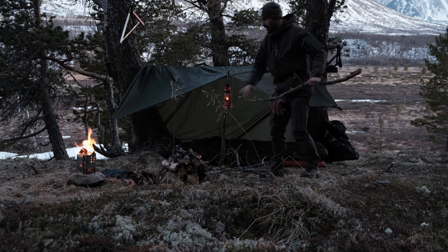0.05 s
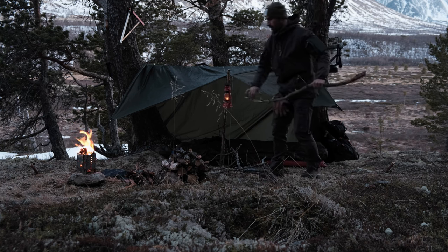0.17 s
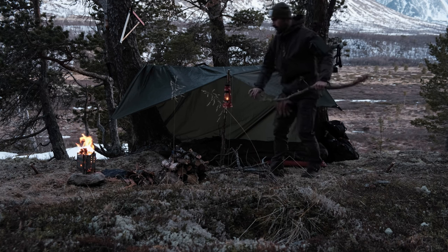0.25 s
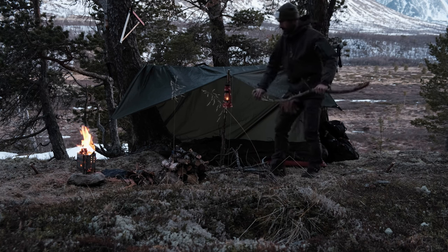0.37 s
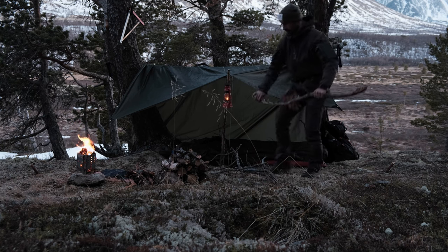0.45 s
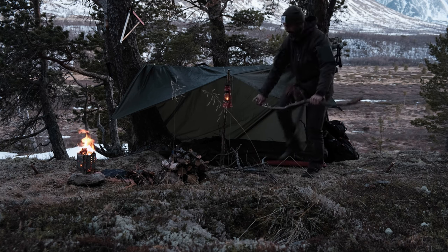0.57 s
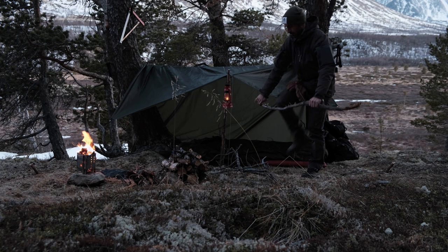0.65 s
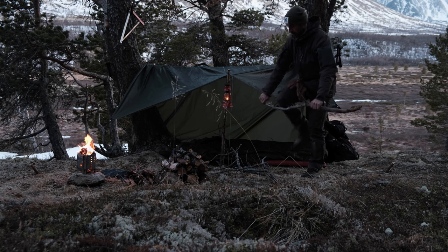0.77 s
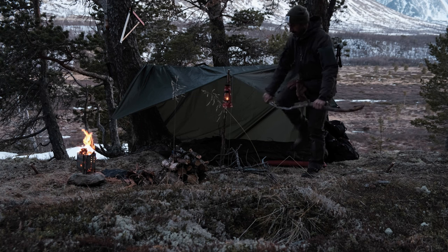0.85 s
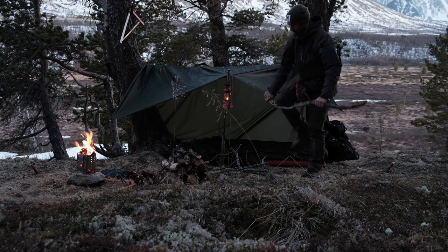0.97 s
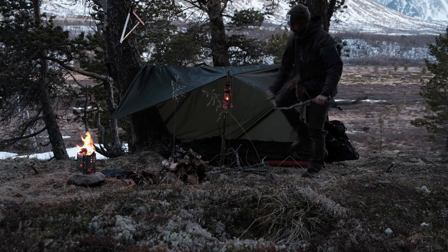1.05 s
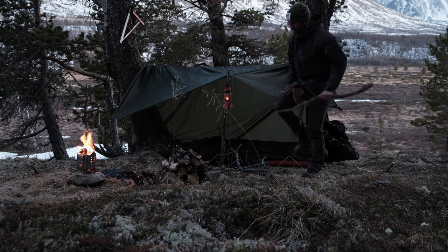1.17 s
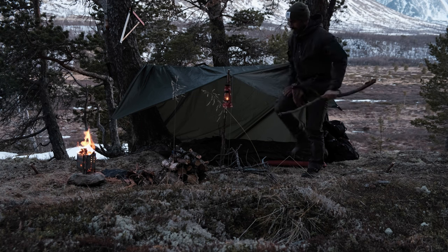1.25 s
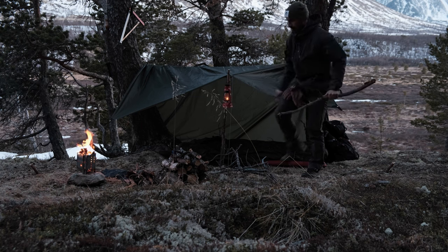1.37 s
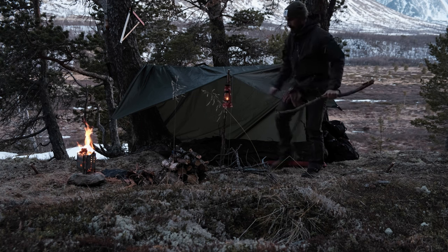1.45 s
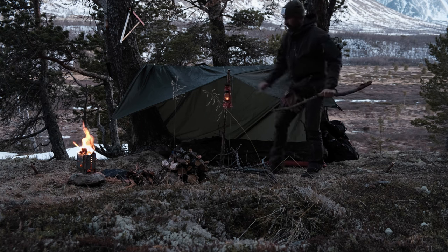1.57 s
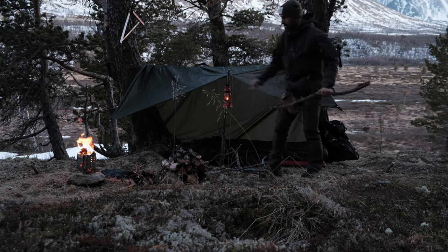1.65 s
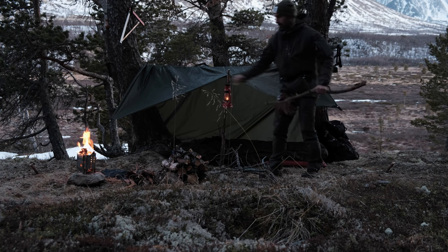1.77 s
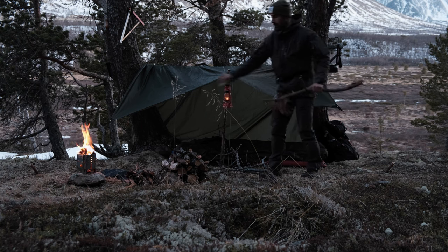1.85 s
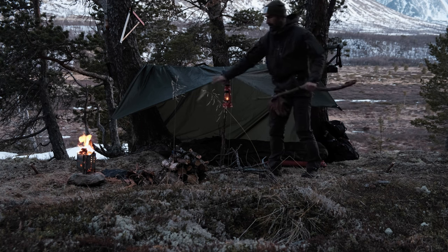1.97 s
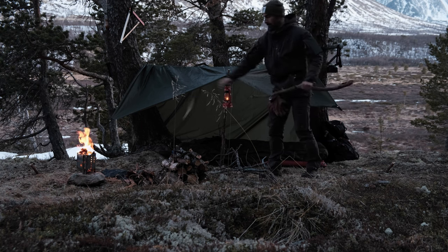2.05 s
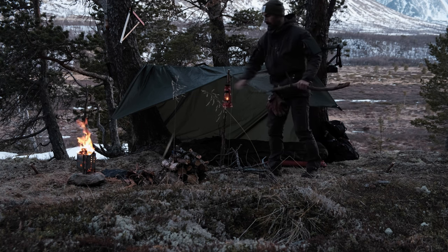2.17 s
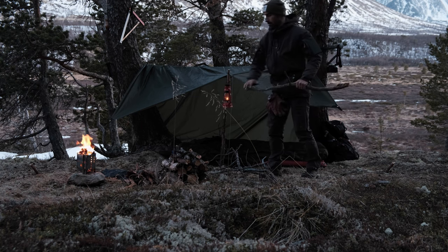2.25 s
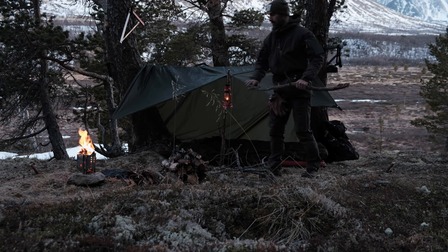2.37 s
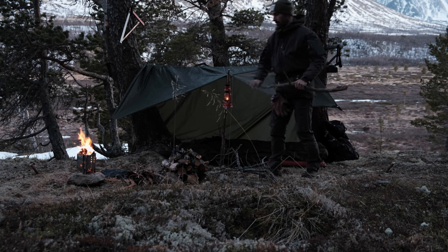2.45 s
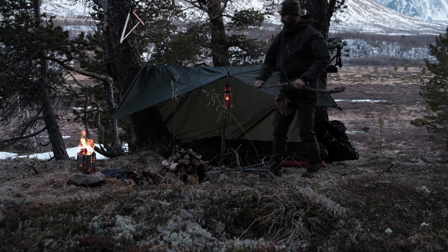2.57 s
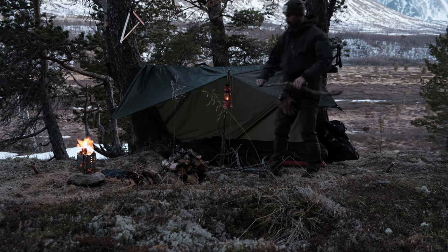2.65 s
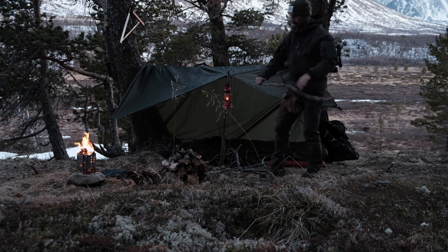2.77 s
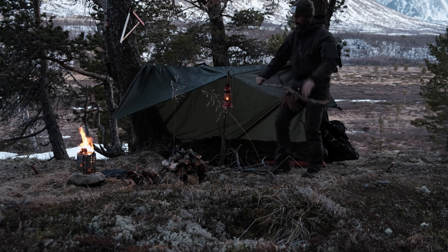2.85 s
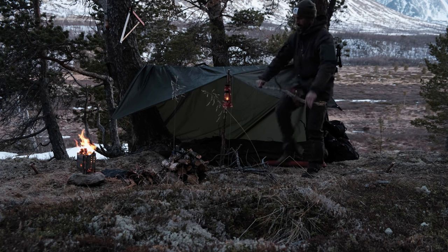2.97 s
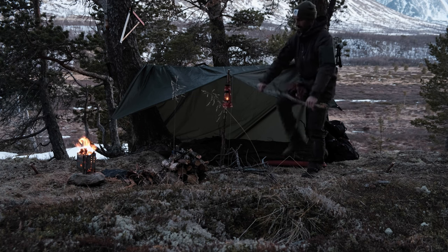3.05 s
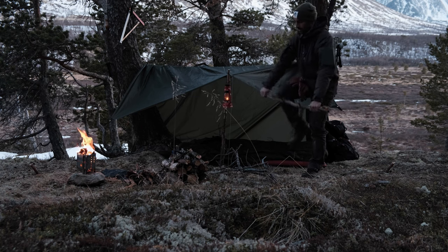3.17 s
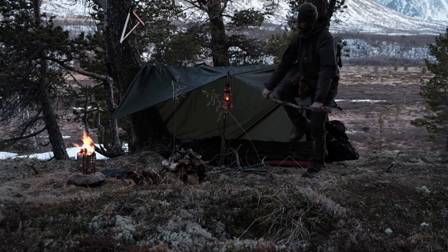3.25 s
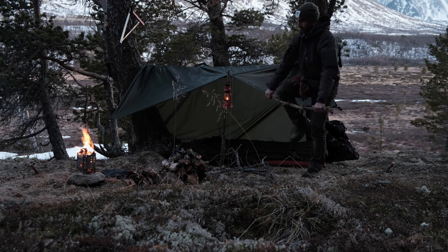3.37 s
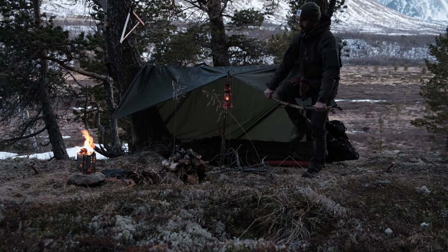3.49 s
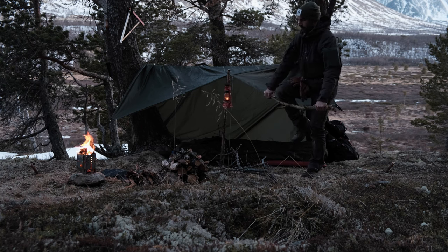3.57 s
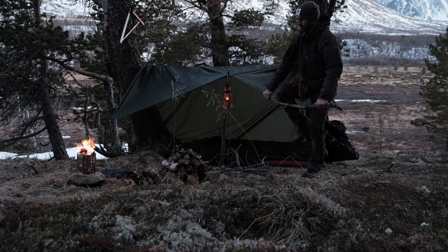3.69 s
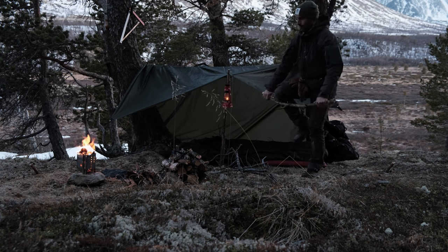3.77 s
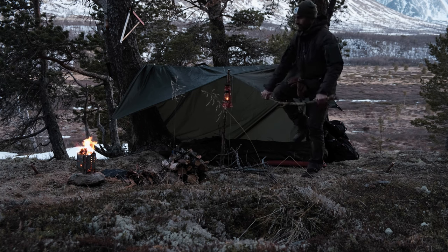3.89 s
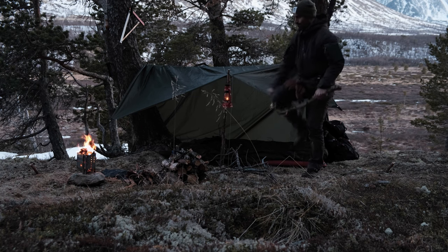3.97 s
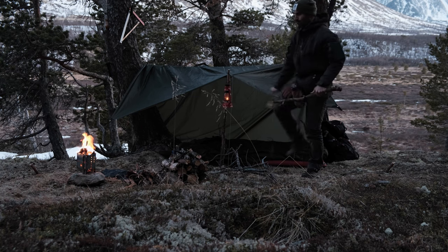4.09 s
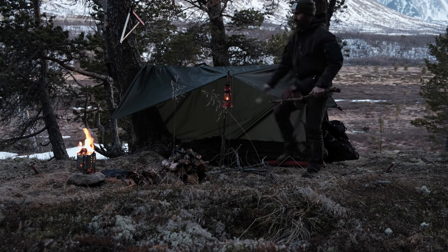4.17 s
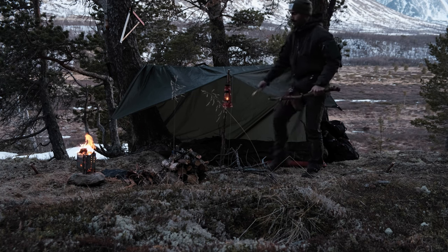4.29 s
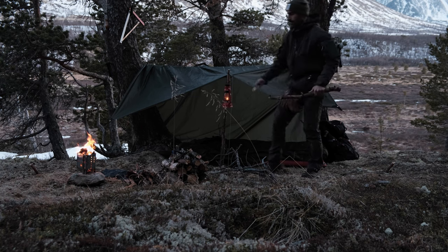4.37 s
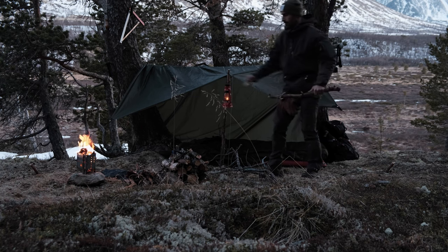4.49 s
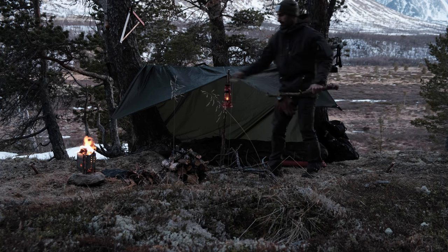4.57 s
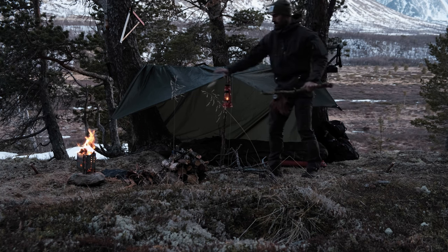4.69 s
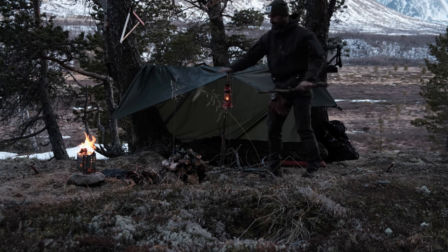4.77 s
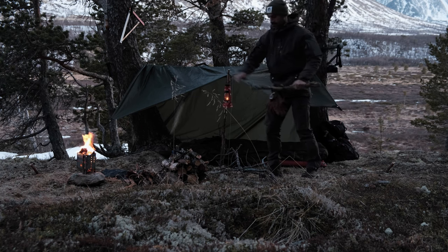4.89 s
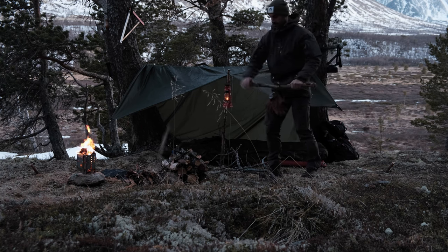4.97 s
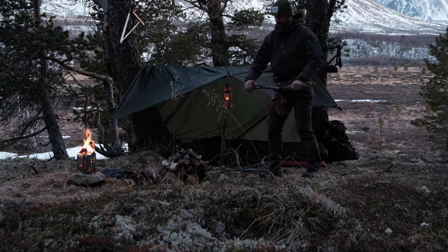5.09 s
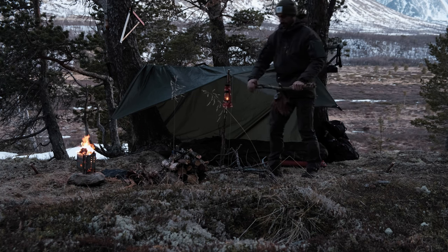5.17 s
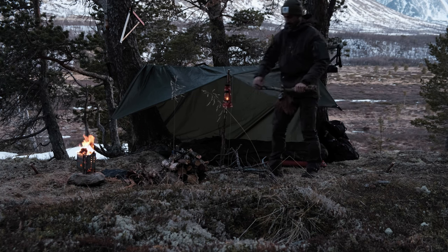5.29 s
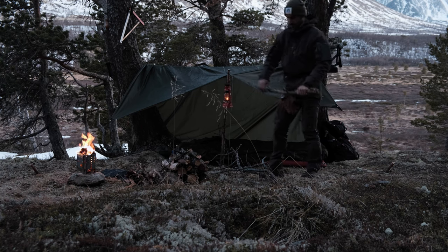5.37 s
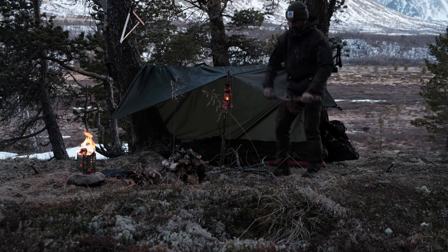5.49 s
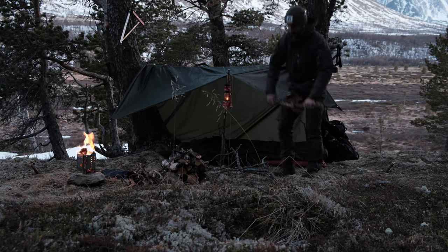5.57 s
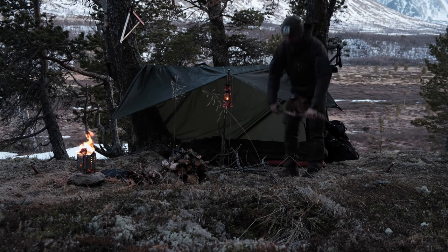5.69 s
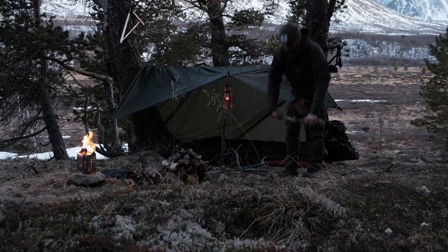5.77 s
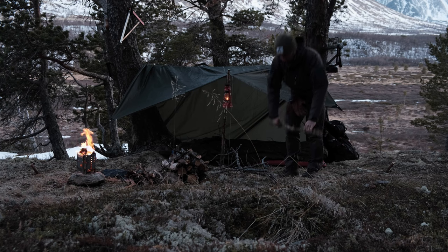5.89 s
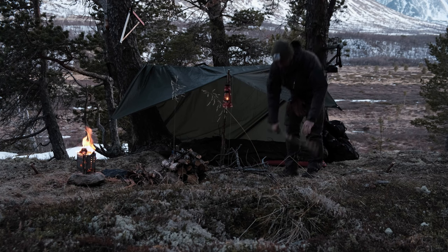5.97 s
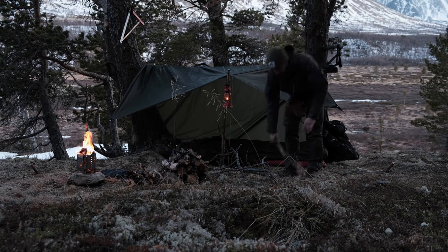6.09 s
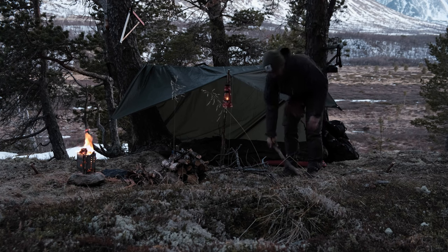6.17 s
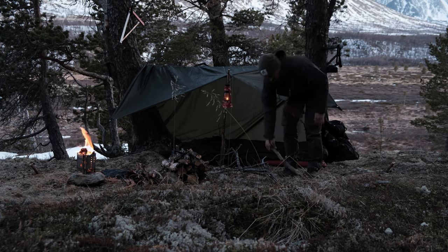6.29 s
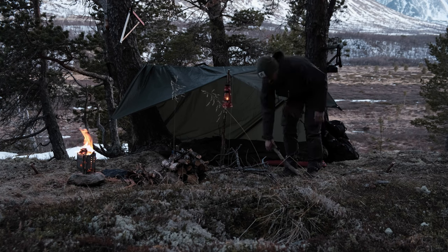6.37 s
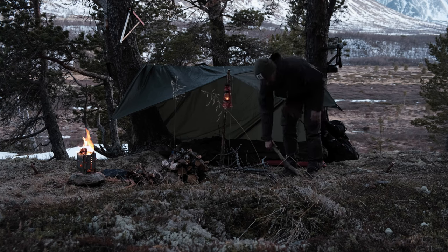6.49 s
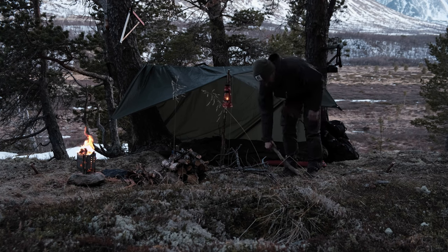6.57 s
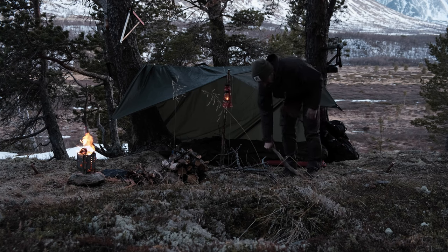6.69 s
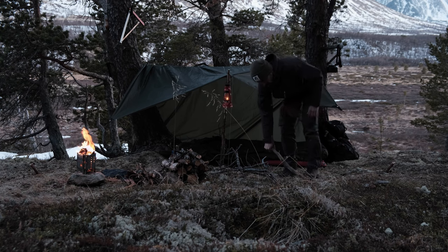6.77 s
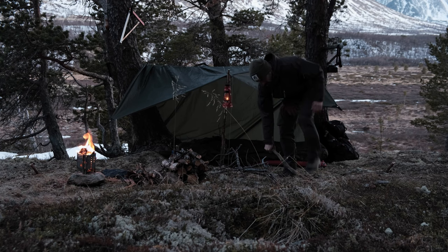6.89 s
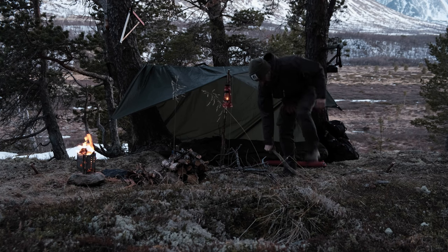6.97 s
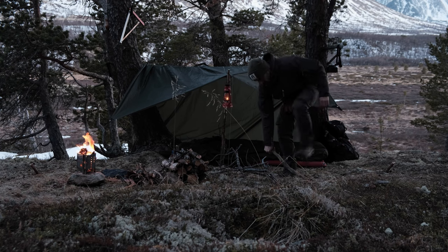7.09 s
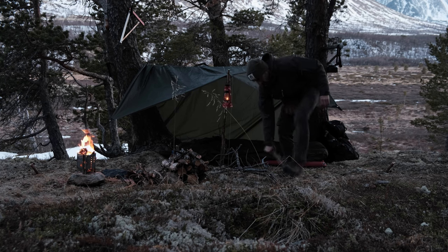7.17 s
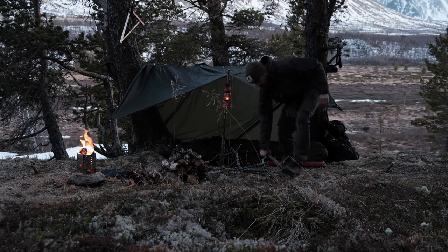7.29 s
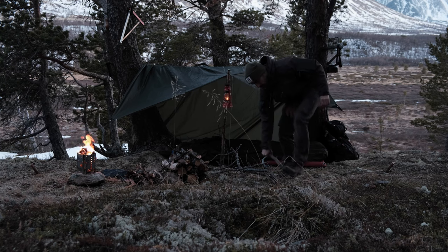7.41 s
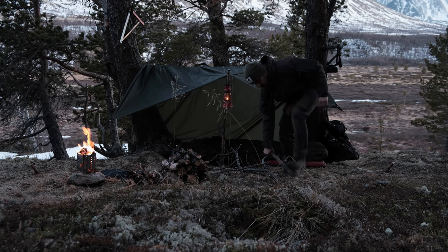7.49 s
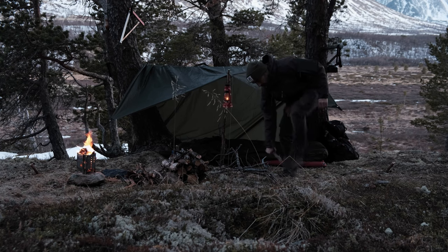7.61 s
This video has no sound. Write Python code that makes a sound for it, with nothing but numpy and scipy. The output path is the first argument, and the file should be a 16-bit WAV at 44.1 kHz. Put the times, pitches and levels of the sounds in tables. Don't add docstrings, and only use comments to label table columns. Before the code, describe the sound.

At a quiet open-air forest camp, a stick is handled with light twig ticks and cloth rustle. A first branch splinters and breaks loudly at one second, its pieces clattering down at about two. A harder, slightly overloaded snap follows near four, then a hollow wooden landing at five. Rustling movement and a crunch of twigs underfoot finish it. Microphone a few metres away, short scattered echoes off trees, faint steady hiss.

```python
import sys
import numpy as np
from scipy import signal
from scipy.fft import rfft, irfft, next_fast_len
from scipy.io import wavfile
from scipy.ndimage import uniform_filter1d

SR = 44100
rng = np.random.default_rng(int(sys.argv[2]) if len(sys.argv) > 2 else 0)


def unload_audio(sound):
    columns = np.transpose(np.atleast_2d(sound))
    steps = np.round(np.clip(columns, -1, 1) * 32767)
    wavfile.write(sys.argv[1], SR, steps.astype(np.int16))


def voltage_ratio(decibels):
    exponent = np.asarray(decibels, float) / 20
    return 10 ** exponent


N = 336924

# (frequency [Hz], density [dB per Hz])
AIR_SPECTRUM = [(20, -8.5), (59, -2.5), (253, -8), (470, -14), (771, -11.5), (1270, -15.5), (1900, -18),
                (15600, -23)]
AIR_LEVEL_DB = -58.5
# (frequency [Hz], likeness [0-1])
AIR_LIKENESS = [(30, 0.43), (70, 0.28), (180, 0.97), (550, 0.49), (1650, 0.74), (4970, 0.42), (15000, 0.18)]
# (time [s], length [s], cloth level [dB], lichen level [dB])
MOVEMENTS = [(0.03, .08, -67, -67.5), (0.22, .08, -66, -67.5), (0.35, 0.2, -63.5, -70),
             (0.58, 0.22, -62.5, -64), (0.85, .12, -70.5, -72.5), (1.32, .2, -68, -72),
             (1.7, 0.2, -61, -66), (1.92, .08, -62, -64.5), (2.1, .1, -71, -81), (2.5, .1, -72, -65.5),
             (2.7, 0.24, -65, -68.5), (3.03, 0.22, -62.5, -64), (3.2, 0.159, -64, -62),
             (3.4, .08, -72, -69), (3.58, 0.076, -67.5, -78), (4.25, .2, -65, -70.5),
             (4.52, 0.117, -66, -69.5), (4.63, 0.061, -65, -74), (5.27, .05, -71, -69),
             (5.52, 0.16, -65, -69), (5.76, .2, -58, -59), (5.97, 0.18, -61, -68), (6.2, .15, -64, -65),
             (6.32, 0.061, -65, -70), (6.55, .15, -66, -68), (6.88, .16, -58, -58.5),
             (7.1, 0.207, -60, -60), (7.36, .08, -65, -69), (7.5, .05, -62.5, -69),
             (7.63, 0.13, -62.5, -64)]
# (cloth level [dB], lichen level [dB])
STILL_LEVELS_DB = [-80, -82]
# (frequency [Hz], density [dB per Hz])
CLOTH_SPECTRUM = [(250, -41.5), (450, -8), (750, -1.5), (1100, -4), (1400, -6), (2000, -12.5), (4000, -29)]
# (frequency [Hz], density [dB per Hz])
LICHEN_SPECTRUM = [(1200, -29.5), (2200, -7.5), (3400, 2), (5500, -7.5), (8000, 1), (10000, -13),
                   (16000, -10.5)]
# (time [s], crackle energy [dB], treble [dB], knock [dB], splinter [Hz])
TWIG_TAPS = [(0.0188, -25, -4, -28, 4530), (0.0936, -33.5, 4, -19, 3100), (0.1093, -17, -2, -6.5, 2460),
             (0.2283, -36, -10.5, -16, 4435), (0.2948, -37, 8, 5, 8280), (0.3384, -44, -6.5, 11, 910),
             (1.929, -38, 3.5, 0, 7430), (3.0505, -38, -4, 7, 865), (4.967, -28.5, -0.7, -25, 4940),
             (4.9888, -35, -4, -5.5, 2890), (5.3392, -34.5, -18, -20.5, 3340), (5.662, -38, 5, -8, 8030),
             (6.0499, -34, 2, 6, 1070), (6.1252, -28.5, 3.5, -10.5, 8180)]
# (time [s], crackle energy [dB], treble [dB], knock [dB], splinter [Hz])
PILE_TOSSES = [(2.219, -19.5, -4, -1.5, 3000), (2.233, -24, 4.5, -5, 7370), (2.2417, -27, -11, -19, 4500),
               (2.2692, -15, -3.5, -8, 3500), (2.2776, -17, -1, -1, 8400), (2.2938, -20, -12, -10, 2520),
               (2.3331, -29, -11, 1.5, 1464), (2.358, -49, 14, 15, 810), (2.3769, -36.5, 3, -17, 7601),
               (2.4346, -29.5, -1.5, -11, 2850), (2.4904, -29.5, -14.5, -5.5, 3443),
               (5.0573, -10.5, -12.5, -1, 1490), (5.0687, -10.5, 2, -7, 7640),
               (5.0744, -15.5, -13, 0, 1434), (5.1153, -20.5, -4, -1.5, 4030)]
# (time [s], crackle energy [dB], treble [dB], knock [dB], splinter [Hz])
BOOT_TREAD = [(7.1927, -21, 8, -0.5, 7820), (7.1991, -16.5, 4, -11.5, 8263),
              (7.2095, -22.5, 5.5, 3.5, 8260), (7.216, -34.5, 4.5, 8, 1136), (7.2219, -25.5, 3.5, -3, 8250),
              (7.2281, -36, -3, 14.5, 1378), (7.2935, -38, -13.5, 9, 1210)]
# (centre [Hz], width [Hz], level [dB])
TWIG_MODES = [(506, 190, 1), (890, 83.3, -5.5), (1360, 560, -5)]
# (centre [Hz], width [Hz], level [dB])
BRANCH_MODES = [(633, 280, -3), (967, 120, 1), (1430, 160, 3)]
# (centre [Hz], width [Hz], level [dB])
TREBLE_MODES = [(6193, 3200, -1.5), (8200, 1100, 7.5), (12700, 1800, -1)]
# (low [dB], middle [dB], high [dB])
SNAP_RINGS_DB = [-2.5, -4.5, -4.5]
TAP_RINGS_DB = [-3.5, -5, -3]
FLAKE_RINGS_DB = [8, 8.5, 7.5]
# (delay [s], level [dB])
ECHO_PATHS = [(.003, -17), (.0098, -18), (.014, -23.5), (.019, -25.5), (.026, -28), (.034, -35.5)]
# (frequency [Hz], t60 [s])
TRUNK_DECAY = [(300, 0.087), (1000, 0.3), (3500, 0.082), (8000, 0.24), (14000, .1)]
# (frequency [Hz], t60 [s])
FOREST_DECAY = [(300, 0.47), (1000, 0.88), (3500, 0.45), (8000, 0.5), (14000, 0.14)]
# (frequency [Hz], level [dB], t60 [s])
GRIP_MODES = [(510, 5, 0.075), (963, 0, 0.1), (1500, 6.5, 0.028), (2480, -5, 0.1)]
# (time [s], level [dB])
GRIP_BLOWS = [
    (0.107, -47.5),
    (0.126, -51),
]
# (frequency [Hz], level [dB], t60 [s])
PIECE_MODES = [(495, -12, 0.19), (738, -0.5, .07), (1475, -1, 0.18), (2570, -2, .08), (3100, -2.5, .07),
               (3680, -5.5, 0.096), (4221, -9.5, 0.088)]
# (time [s], level [dB])
PIECE_HITS = [
    (5.058, -42.5),
    (5.070, -46),
    (5.076, -44),
]
# (frequency [Hz], level [dB], t60 [s])
LOG_MODES = [(635, -1.5, 0.24), (1432, 1.5, 0.16), (2500, -4, 0.06), (3500, -10, 0.056)]
# (time [s], level [dB])
LOG_HITS = [
    (5.116, -45),
    (5.131, -60),
    (5.165, -67),
]
# (time [s], crackle energy [dB], splinter [Hz])
BARK_FLAKES = [(5.0688, -22, 13500), (6.9, -33, 13000), (4.5, -40, 8000), (5.7, -49, 3560),
               (5.8, -40, 13500), (2.2335, -37, 12000), (2.2425, -26.5, 4900), (0.2948, -39, 12530),
               (3.7545, -22, 4500)]
# (time [s], level [dB], frequency [Hz])
FABRIC_CHIRPS = [(0.525, -60.5, 3350), (0.572, -60.5, 1820), (5.69, -61, 3400), (5.78, -59.5, 3310),
                 (5.85, -60, 3180), (6.57, -63, 3250), (6.629, -63.5, 3400)]
# (time [s], level [dB], frequency [Hz], cycles to die)
SOFT_THUDS = [(0.922, -46, 151, 2.1), (1.062, -26.5, 420.5, 5.2), (2.288, -39.5, 380, 7.1),
              (3.743, -49, 202, 1.4), (3.936, -38.5, 199, 2.6), (3.937, -22.5, 398.7, 4),
              (3.94, -38.5, 119, 3.6), (4.059, -49, 132, 3.2), (5.059, -47, 248, 5.7),
              (6.049, -50.5, 161, 5.2), (7.1862, -25.5, 217.6, 2.22), (7.187, -41.5, 420, 2.2),
              (2.235, -50, 300.2, 6), (7.197, -28, 132, 2.7), (7.207, -39, 138, 3.6)]
# (time [s], crackle energy [dB], treble [dB], knock [dB], splinter [Hz])
LOUD_BREAKS = [
    (0.9764, 0, -12, -38, 3542),
    (1.0624, 15.6, -7.5, -9.5, 3510),
    (3.7447, 0.5, 4, -12, 7295),
    (3.9365, 19.5, -9, -6.5, 3250),
]
# (time [s], level [dB], spread of splinter starts [s])
FIBRE_TEARS = [(0.9767, -12, 0.00023), (1.0391, -20, 0.00073), (1.0635, -7.5, .0008), (3.7445, -14, .0003),
               (3.937, -3.5, 0.0014)]
# (centre [Hz], width [Hz], level [dB])
TEAR_SPLINTERS = [
    [(1913, 500, -21.5), (3460, 540, -0.5), (5606, 500, -15), (7260, 400, -9), (8190, 450, -11.5),
     (10500, 900, -22), (12400, 600, -18.5)],
    [(2950, 530, -1), (4500, 400, -0.5), (5410, 360, -3), (6280, 310, -3), (7780, 390, -6), (8640, 300, -6),
     (10800, 320, -14), (13100, 360, -11)],
    [(490, 200, -12), (910, 130, -4.5), (1480, 220, -11), (1980, 350, -13.5), (2360, 440, -11),
     (3000, 170, -5.5), (3590, 290, 0), (3800, 250, -3), (4460, 250, -4.5), (5100, 350, -8),
     (5400, 430, -8), (6330, 600, -2.5), (7500, 790, -3.5), (8400, 1300, -9.5)],
    [(1000.3, 320, -12.5), (1880, 230, -5.5), (2486, 350, -5.5), (3490, 300, -8), (4030, 500, -3),
     (4730, 400, -9.5), (5755, 350, -2.5), (7330, 440, 1), (8280, 250, -3), (9170, 600, -2),
     (10400, 280, -9), (10950, 400, -7), (11800, 400, -7.5), (13100, 650, -11)],
    [(630, 200, -3.5), (1080, 330, -5), (1378.4, 370, 2), (1700, 370, -4.5), (2150, 190, -9.5),
     (3000, 300, -5.5), (3350, 410, -2), (4520, 370, -8.5), (5080, 480, -1), (5800, 500, -9),
     (7190, 320, -9.5), (8090, 360, -10.5), (8740, 280, -11), (11300, 320, -11)],
]
# (time [s], length [s], level [dB])
DUST_PUFFS = [(0.98, .03, -44), (1.045, .03, -40), (1.07, .05, -30), (1.12, .07, -48.5), (3.75, .05, -37.5),
              (3.945, .05, -30), (4.0, .08, -48), (4.2, .03, -55), (5.075, .08, -50), (6.13, .05, -57),
              (5.15, .05, -58), (7.2, .04, -50)]
# (frequency [Hz], density [dB per Hz])
DUST_SPECTRUM = [(2500, -30), (4500, -6), (6000, 0.5), (9000, -4), (11500, -3), (15000, -7)]
# (time [s], crackle energy [dB], treble [dB], knock [dB], splinter [Hz])
FIBRE_SNAPS = [(1.007, -18.5, 0, -14.5, 3500), (1.0126, -9.5, 0.6, -22, 8276),
               (1.019, -2, -10, -22.5, 3668), (1.0259, -12, -14.5, -12.5, 3879),
               (1.039, -1, -2, -14.5, 4468), (1.0483, -21, 5, -18, 8376), (1.1141, -28, 8.5, -8, 7030),
               (1.1255, -23, -2.5, -4, 2030), (3.8651, -39, 4, -17, 8400), (3.9516, -8, -6, 5.5, 1652),
               (3.9763, -9.5, 2, -22, 3127), (3.9842, -20.5, -8, -0.5, 1401),
               (4.0612, -24, -20.5, -6, 3302), (4.2025, -34.5, 6.5, -7, 8120)]
# (time [s], level [dB], frequency [Hz], cycles to die)
BARK_TICKS = [(5.064, -33.5, 3000, 15), (5.0655, -34, 5500, 25), (5.091, -42, 11600, 50),
              (5.0915, -40.5, 8070, 32), (5.139, -47, 7900, 40), (5.1455, -44.5, 8400, 36),
              (5.148, -52, 4200, 20), (5.1555, -47, 5200, 14), (5.156, -51, 3300, 12),
              (5.178, -43, 13540, 52), (5.179, -53, 8600, 38), (5.178, -53, 3600, 24),
              (3.9535, -23, 4500, 17), (3.9575, -26, 3580, 24), (3.9635, -30, 3500, 20),
              (3.9785, -32, 3000, 16), (3.990, -36, 3200, 16), (4.0145, -40, 3000, 16),
              (4.019, -39, 4100, 18), (4.027, -41, 3400, 16), (4.034, -39, 2900, 16),
              (4.040, -41, 3500, 18), (4.046, -41, 3800, 18), (4.071, -45, 3900, 18),
              (1.126, -44, 1980, 12), (1.147, -45, 2150, 20)]
# (time [s], level [dB], frequency [Hz], cycles to die)
WOOD_KNOCKS = [(1.145, -48, 1000, 9), (1.154, -42, 1080, 11), (1.166, -42.5, 944, 8.7),
               (1.178, -45.5, 1020, 11), (1.197, -40, 1000, 9), (1.209, -47, 1050, 7.6),
               (2.2765, -31.5, 429, 3.4), (2.252, -46, 1400, 8), (2.253, -49, 3220, 12),
               (2.286, -39.5, 1600, 6.5), (2.304, -49.5, 700, 6), (3.7445, -45.5, 90, 1.5),
               (3.9835, -30.5, 696, 2.7), (3.9838, -26, 1550, 6.4), (4.006, -45, 1100, 5.6),
               (4.033, -38, 1300, 7), (4.0612, -31, 1080, 3.6), (4.1354, -50.5, 1680, 15),
               (4.1658, -49.5, 1420, 6), (3.0495, -47, 890, 5), (7.1675, -40.5, 899, 4.7),
               (7.188, -40, 85, 2.5), (7.235, -45, 900, 11), (7.251, -46, 880, 8), (7.224, -47, 1990, 10),
               (2.278, -49.5, 130, 2.7)]
# (time [s], length [s], level [dB])
CREAKS = [(1.165, .03, -51), (1.195, 0.031, -48), (4.62, 0.057, -64.5), (6.28, 0.043, -60.5),
          (6.55, 0.11, -64), (6.87, 0.096, -60.5)]
# (time [s], length [s], dull level [dB], bright level [dB])
CRUMB_FALLS = [(2.28, 0.1, -50.5, -51.5), (4.0, 0.14, -49, -57), (2.25, 0.023, -52.5, -52),
               (4.035, 0.038, -51, -50), (4.07, .07, -52, -60), (5.07, 0.15, -52, -50),
               (5.17, .05, -69, -57.5), (6.055, 0.056, -53.5, -59), (6.13, 0.0704, -60, -53),
               (7.197, 0.092, -46, -44.5), (7.228, 0.051, -48.5, -53), (7.33, 0.07, -61, -72),
               (3.755, 0.093, -52, -46)]
# (frequency [Hz], density [dB per Hz])
GRIT_SPECTRUM = [(300, -29), (700, -2.5), (1200, 0.5), (2500, -7), (4500, -15.5), (8000, -30)]


def unit(x):
    return x / np.sqrt(np.mean(x ** 2) + 1e-20)


def along(points, hz):
    f, v = np.transpose(points)
    return np.interp(np.log(hz + 1), np.log(f + 1), v)


def filtered(x, response):
    size = next_fast_len(x.shape[-1] + 2048)
    spectrum = rfft(x, size) * response(np.fft.rfftfreq(size, 1 / SR))
    return irfft(spectrum, size)[..., :x.shape[-1]]


def air():
    def mid_side(hz):
        angle = np.arccos(np.clip(along(AIR_LIKENESS, hz), -1, 1)) / 2
        return voltage_ratio(along(AIR_SPECTRUM, hz)) * [np.cos(angle), np.sin(angle)]

    mid, side = filtered(rng.standard_normal((2, N)), mid_side)
    return voltage_ratio(AIR_LEVEL_DB - 1.0) * unit(np.array([mid + side, mid - side]))


def grains(per_second, spread_db):
    hits = rng.random(N) < per_second / SR
    heights = rng.standard_normal(N)
    return hits * heights * voltage_ratio(spread_db * np.minimum(rng.exponential(size=N), 2.5))


def coloured_grains(per_second, spread_db, spectrum):
    return unit(filtered(grains(per_second, spread_db), lambda hz: voltage_ratio(along(spectrum, hz))))


def swells(rows, rise, bend):
    s, length, *levels = np.transpose(rows)[..., None]
    t = np.arange(0, N, 32) / SR
    reach_s = np.abs(length) * np.where(t < s, rise, 1)
    fade_db = -20 * np.abs((t - s) / reach_s) ** bend
    gains = [np.sqrt(np.sum(voltage_ratio(db + fade_db) ** 2, 0)) for db in levels]
    return [np.interp(np.arange(N) / SR, t, gain) for gain in gains]


def patchy(x, depth_db):
    z = signal.stft(x, nperseg=512)[2]
    field = uniform_filter1d(rng.standard_normal(z.shape), 8, 0)
    field = uniform_filter1d(field, 8, 1)
    return signal.istft(z * voltage_ratio(depth_db * unit(field)), nperseg=512)[1][:N]


def rustle():
    rub, crumble = np.array(swells(MOVEMENTS, rise=0.9, bend=1.8)) + voltage_ratio(STILL_LEVELS_DB)[:, None]
    cloth = voltage_ratio(-2.0) * rub * coloured_grains(900, -1.0, CLOTH_SPECTRUM)
    lichen = voltage_ratio(-1.5) * crumble * coloured_grains(3600, 1.0, LICHEN_SPECTRUM)
    return patchy(cloth + lichen, depth_db=2.0)


def resonant(x, modes):
    def response(f):
        return sum((-1) ** k * voltage_ratio(db) * 1j * f * width / (centre * centre - f * f + 1j * f * width)
                   for k, (centre, width, db) in enumerate(modes))

    return filtered(x, response)


def add(track, s, x):
    part = track[round(s * SR):][:len(x)]
    part += x[:len(part)]


def cracks(table, body, rings_db, t60, thick_slower, sharp, spiky_db, rise, spread):
    out, t = np.zeros((2, N)), np.arange(SR // 16) / SR
    click = (t == 0) * 1.

    def low(x):
        return resonant(resonant(x, body), [(830, 1200, 0)])

    def middle(x):
        for mode in [(2850, 3000, 0), (3400, 6400, 0), (3835, 10000, 0)]:
            x = resonant(x, [mode])
        return x

    def high(x):
        return resonant(resonant(x, TREBLE_MODES), [(10900, 32000, 0)])

    click_bands = [low(click), middle(click), high(click)]
    for s, db, treble_db, knock_db, hz in table:
        noise = rng.standard_normal((4, len(t)))
        lasts_s = t60 * (1 + thick_slower * min(voltage_ratio(knock_db), 1))
        swell = voltage_ratio(-60 * t / lasts_s) * (1 - np.exp(-t / rise))
        burst = noise[:3] * voltage_ratio(spiky_db * noise[3]) * swell
        pluck = swell ** 2 * np.sin(2 * np.pi * hz * t) + 0.37 * burst[0]
        ring = resonant(pluck, [(hz, hz / sharp, 0)])
        levels_db = [knock_db, 0, treble_db]
        power = voltage_ratio(levels_db) ** 2
        band = np.searchsorted([1500, 6000], hz)
        ring_db = levels_db[band] + rings_db[band]
        power[band] = max(power[band] - voltage_ratio(ring_db) ** 2, 0.099 * power[band])
        near = [low(burst[0]), middle(burst[1]), high(burst[2]), ring]
        all_round = [*click_bands, resonant(click, [(hz, spread * hz / sharp, 0)])]
        for gain, pair in zip([*np.sqrt(power), voltage_ratio(ring_db)], zip(near, all_round)):
            for track, x in zip(out, pair):
                add(track, s, voltage_ratio(db) * gain * x / np.linalg.norm(x))
    return out


def twig_cracks():
    return voltage_ratio(0.85) * cracks(TWIG_TAPS + PILE_TOSSES + BOOT_TREAD, TWIG_MODES, TAP_RINGS_DB, t60=0.016,
                              thick_slower=0.97, sharp=3.2, spiky_db=2.5, rise=0.00017, spread=4.5)


def tail(t60s, delay):
    hz, t, z = signal.stft(rng.standard_normal(SR // 2), SR, nperseg=128)
    decay = voltage_ratio(-60 * t / along(t60s, hz)[:, None])
    x = signal.istft(z * decay, SR, nperseg=128)[1]
    return np.pad(x / np.linalg.norm(x), (round(delay * SR), 0))


def camp_echoes(x):
    out, t = np.zeros(N), np.arange(SR // 50) / SR
    for start, stop in [(0, N // 3), (N // 3, N // 2), (N // 2, N)]:
        answer = np.zeros(SR)
        for s, db in ECHO_PATHS:
            smear = rng.standard_normal(len(t)) * voltage_ratio(-60 * t / 0.017)
            add(answer, s, voltage_ratio(db) * smear / np.linalg.norm(smear))
        add(answer, 0, voltage_ratio(-22) * tail(TRUNK_DECAY, 0.004))
        add(answer, 0, voltage_ratio(-31.0) * tail(FOREST_DECAY, 0.03))
        add(out, start / SR, signal.fftconvolve(x[start:stop], answer))
    return out


def ringing(modes, blows):
    out, t = np.zeros(N), np.arange(SR // 3) / SR
    onset = 1 - np.exp(-t / 0.00044)
    for s, db in blows:
        for hz, level_db, t60 in modes:
            decay = voltage_ratio(db + level_db + rng.normal(0, 1) - 60 * t / t60)
            add(out, s, decay * np.sin(2 * np.pi * hz * t) * onset)
    return out


def bark_flakes():
    rows = [(s, db, 0.3, -20.5, hz) for s, db, hz in BARK_FLAKES]
    return cracks(rows, TWIG_MODES, FLAKE_RINGS_DB, t60=0.0063, thick_slower=0.3, sharp=6,
                  spiky_db=3.5, rise=0.0003, spread=3)[0]


def squeaks():
    out, length = np.zeros(N), SR // 40
    for s, db, hz in FABRIC_CHIRPS:
        chirp = unit(resonant(rng.standard_normal(length), [(hz, 250, 0)]))
        add(out, s, voltage_ratio(db) * np.hanning(length) * chirp)
    return out


def swings(table, onset):
    out = np.zeros(N)
    for s, db, hz, cycles in table:
        life = np.arange(round(1.5 * SR * cycles / hz)) * hz / cycles / SR
        envelope = voltage_ratio(db + 16.0 - 60 * life) * (4 * life) ** onset
        add(out, s, envelope * np.sin(2 * np.pi * cycles * life))
    return out


def thuds():
    return resonant(swings(SOFT_THUDS, onset=1.7), [(225, 250, 0.0008)])


def loud_breaks():
    heard = cracks(LOUD_BREAKS, BRANCH_MODES, SNAP_RINGS_DB, t60=0.0067, thick_slower=1.4, sharp=6.0,
                   spiky_db=4.0, rise=0.00025, spread=1.9)
    return voltage_ratio([[-5.5], [-0.3]]) * heard


def shards():
    starts = rng.random((len(FIBRE_TEARS), 16))
    rows = []
    for (s, db, spread_s), modes, row in zip(FIBRE_TEARS, TEAR_SPLINTERS, starts):
        for (hz, width, level_db), u in zip(modes, row):
            ring_db = db + level_db + 20 * np.log10(width / 400)
            rows.append((s + spread_s * u, ring_db, hz, 1.7 * hz / width))
    rings = swings(rows, onset=0.75)
    return filtered(rings, lambda hz: (1j * hz / (1j * hz + 420)) ** 2)


def dust():
    return swells(DUST_PUFFS, rise=0.12, bend=0.97)[0] * coloured_grains(9700, 2.5, DUST_SPECTRUM)


def fibre_snaps():
    return voltage_ratio(1.0) * cracks(FIBRE_SNAPS, BRANCH_MODES, SNAP_RINGS_DB, t60=0.0047, thick_slower=1.5,
                             sharp=6.3, spiky_db=5.0, rise=0.00057, spread=1.0)


def ticks():
    return swings(BARK_TICKS, onset=0.9)


def knocks():
    return swings(WOOD_KNOCKS, onset=1.2)


def creak():
    slips = resonant(grains(1200, spread_db=1.0), [(1000, 430, 0)])
    slips = resonant(slips, [(1090, 780, 0)])
    return swells(CREAKS, rise=0.9, bend=2.2)[0] * unit(slips)


def crumbs():
    dull_gain, bright_gain = swells(CRUMB_FALLS, rise=0.24, bend=0.79)
    dull = coloured_grains(900, 1.5, GRIT_SPECTRUM)
    bright = coloured_grains(6000, 2.5, LICHEN_SPECTRUM)
    return dull_gain * dull + bright_gain * bright


def scene():
    cracking = fibre_snaps() + twig_cracks() + loud_breaks()
    struck = ringing(PIECE_MODES, PIECE_HITS) + ringing(LOG_MODES, LOG_HITS) + ringing(GRIP_MODES, GRIP_BLOWS)
    direct, all_round = cracking + struck
    wood = direct + shards() + camp_echoes(all_round) + thuds() + knocks() + creak()
    near = wood + ticks() + crumbs() + squeaks() + rustle()
    return near + air() + bark_flakes() + dust()


def band_limit(x):
    return signal.sosfilt(signal.butter(12, 15790, fs=SR, output="sos"), x)


def record(dry):
    clipped = dry / (1 + np.abs(dry) ** 8) ** (1 / 8)
    return band_limit(clipped)


dry = scene()
out = record(dry)
unload_audio(out)
```